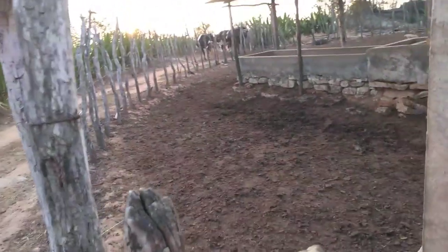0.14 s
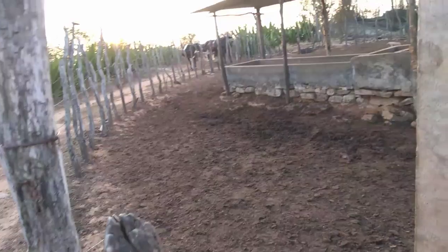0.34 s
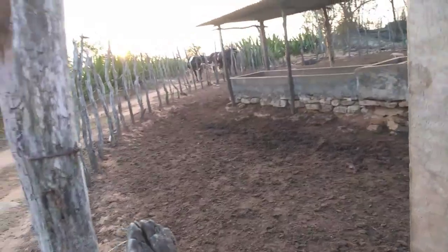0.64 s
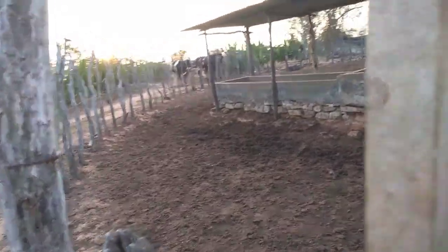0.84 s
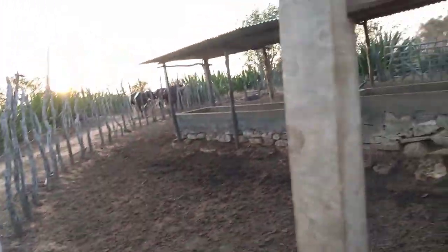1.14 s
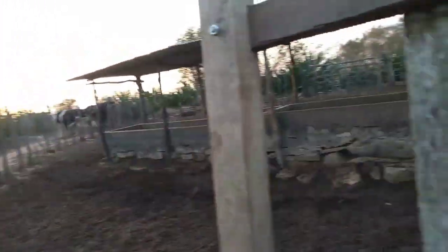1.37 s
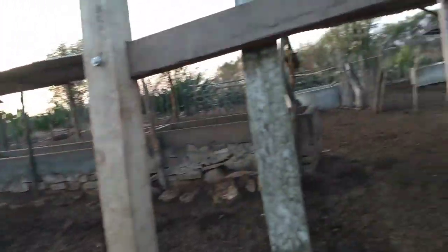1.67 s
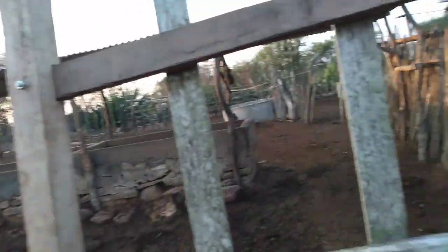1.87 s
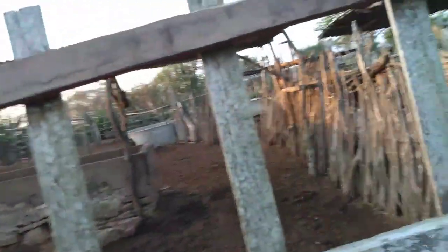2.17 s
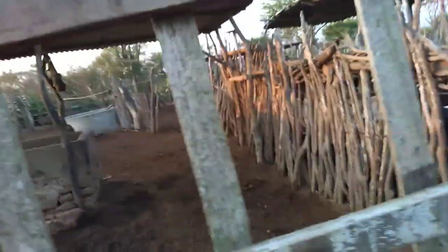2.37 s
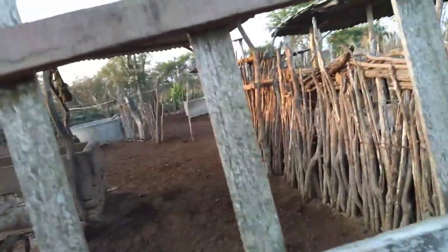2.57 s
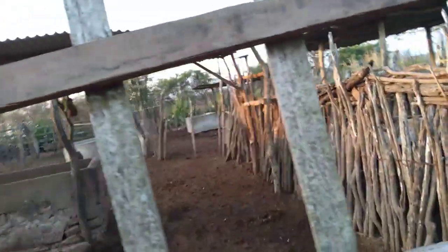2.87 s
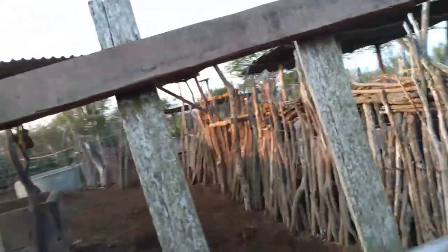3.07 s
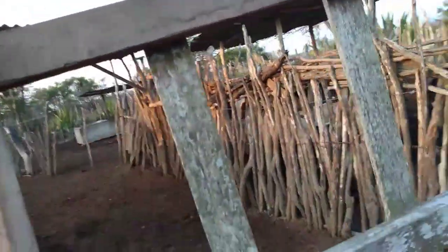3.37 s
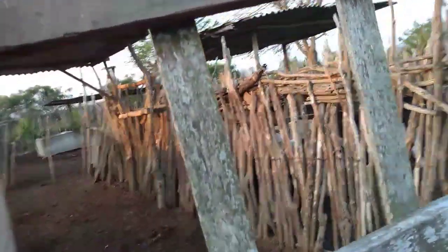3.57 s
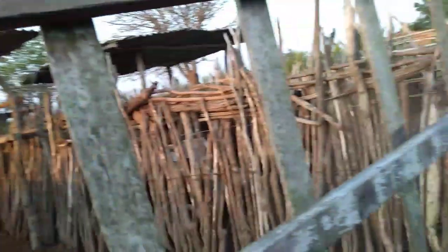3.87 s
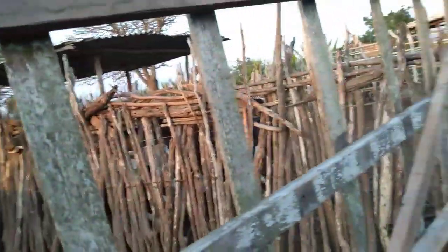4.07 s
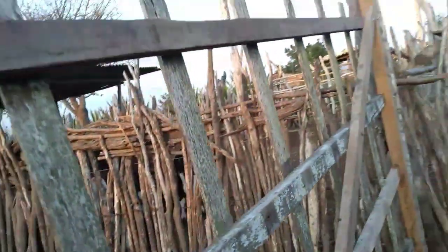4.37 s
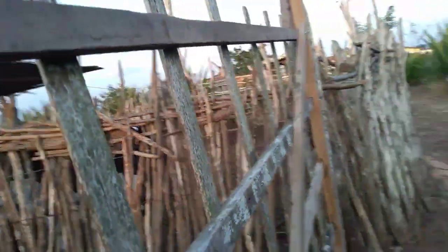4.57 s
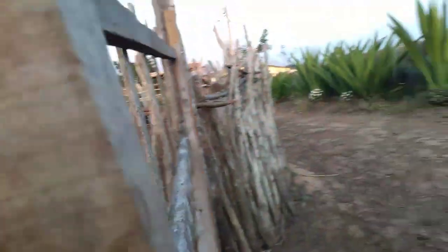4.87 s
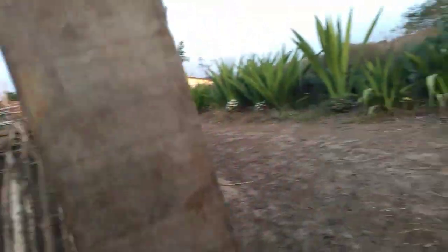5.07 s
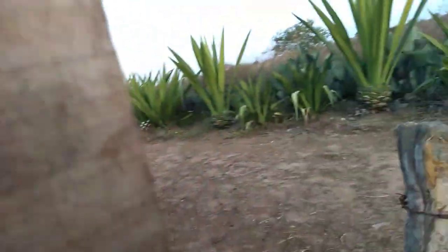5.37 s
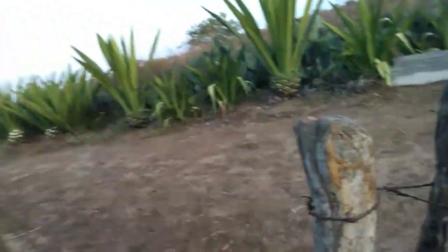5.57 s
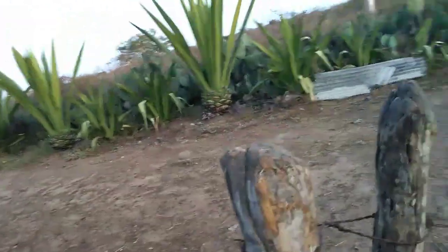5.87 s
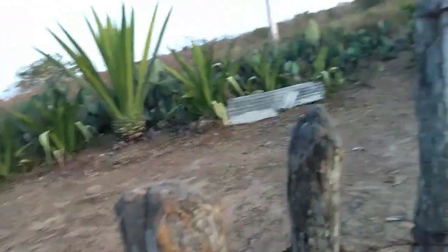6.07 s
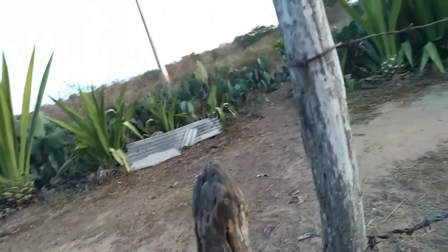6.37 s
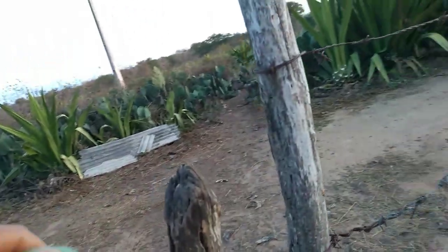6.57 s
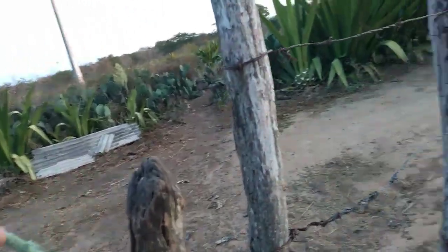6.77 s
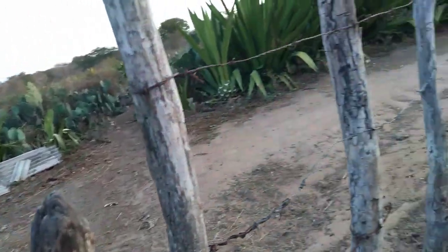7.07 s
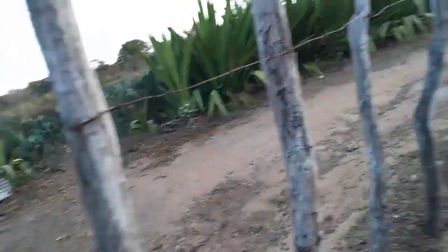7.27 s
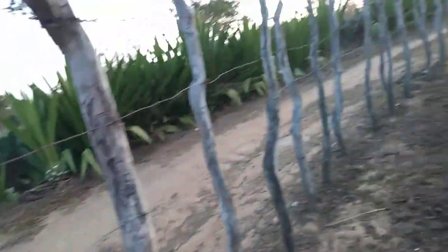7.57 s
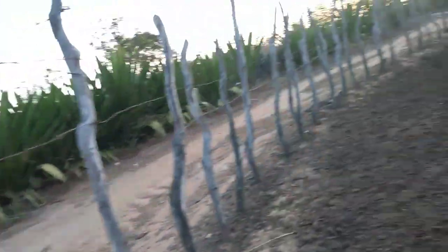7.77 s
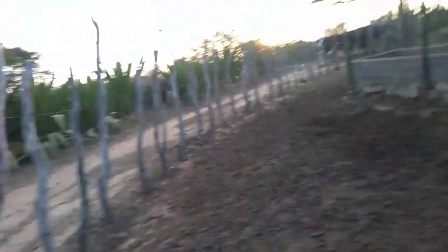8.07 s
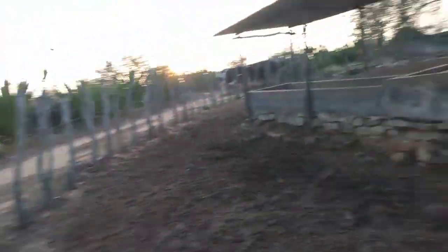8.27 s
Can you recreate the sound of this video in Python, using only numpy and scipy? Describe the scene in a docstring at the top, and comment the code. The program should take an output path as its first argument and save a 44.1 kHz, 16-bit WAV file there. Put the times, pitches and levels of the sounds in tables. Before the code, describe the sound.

In an outdoor farm pen, a cow gives a long, rising moo and another answers from farther off. A wooden latch knocks and wind buffets the microphone. A nearby gate then creaks open for about two seconds, its separate clicks speeding into a judder. After some faint scuffs on dry earth comes a second long moo, ending with a sharp wooden knock and more gusts.

```python
"""Cattle and a creaking farm gate

Two long moos and a distant third, each a buzz of vocal folds shaped by the throat. A wooden gate is
unlatched, swings on a hinge that sticks and slips, and knocks against its post. Gusts buffet the
microphones and feet scuff dry earth, over faint birds, leaves, a brushing sleeve and a far engine.
A stereo widener spreads the whole picture."""
import sys
import numpy as np
from scipy import signal
from scipy.fft import rfft, irfft
from scipy.io import wavfile
from scipy.ndimage import map_coordinates

SR = 44100
rng = np.random.default_rng(int(sys.argv[2]) if len(sys.argv) > 2 else 0)


def unload_audio(sound):
    """Save the sound as a 16-bit wav file, at the path given as the first command line argument."""
    columns = np.transpose(np.atleast_2d(sound))
    # keep every value between -1 and 1, then stretch to whole-number steps
    steps = np.round(np.clip(columns, -1, 1) * 32767)
    wavfile.write(sys.argv[1], SR, steps.astype(np.int16))


N = 372204
TIME = np.arange(N) / SR

# spectrum of the gate's loose boards: (frequency [Hz], level [dB])
BOARD_RATTLE = [(150, 15), (500, 6.5), (1100, -4.5), (1900, -5.5), (3000, -20), (5000, -26.5),
                (14000, -37.5)]


def first_cow():
    """A closed, rising moo: the mouth moves the upper resonances, which fade first as effort falls."""
    # (time [s], pitch [Hz], relative level [dB], mouth opening [factor on upper resonances])
    phrase = [(.47, 99, -48, 0.68), (.59, 136.4, -37.5, 1.21), (.67, 158.3, -36.5, 1.045),
              (.82, 165.2, -36, 1.16), (1.03, 165.4, -35.5, 1.127), (1.17, 167.3, -35.5, 1.165),
              (1.33, 172.1, -36.5, 1.28), (1.48, 176.1, -41.5, 1.2), (1.55, 168, -45, 1.4)]
    # low and upper resonances: (frequency [Hz], width [Hz], gain [dB])
    chest = [(162, 207, 4), (260, 42.3, 18.5)]
    upper = [(933, 134, -8), (1320, 147, -20), (1650, 470, -28), (2360, 350, -40.5), (3580, 900, -47)]
    t, pitch, level_db, mouth = curves(phrase)
    effort = amp(level_db - level_db.max())

    def gain_at(hz):
        return throat(chest, hz) + effort * throat(upper, hz, mouth)

    voice = moo(t, pitch, level_db + 3.5, gain_at, jitter=.0019, rough=.079)
    return place(voice, pan_db=5, wet_db=-14, t60=.35)


def second_cow(opens_at_s=6.22, opening_s=.057):
    """A shut-mouthed hum opens into a bawl that dulls as it tires."""
    # (time [s], pitch [Hz], relative level [dB])
    phrase = [(5.56, 106.1, -81), (5.66, 113.2, -58), (5.78, 127.2, -51.5), (5.92, 134.8, -49.5),
              (6.05, 140, -50), (6.22, 142, -47.5), (6.3, 142.5, -46.5), (6.6, 140.9, -47),
              (6.69, 138.4, -48), (6.76, 125.7, -48.5), (6.81, 107.2, -56.5)]
    # resonances with the mouth shut and open: (frequency [Hz], width [Hz], gain [dB])
    hum = [(137, 78, 19), (286, 180, 12), (705, 140, -2), (1035, 160, -4), (1274, 98, -7), (1408, 59, 2.5),
           (1750, 260, -33), (2950, 720, -12.5), (4770, 1400, -21)]
    bawl = [(140, 98, -8), (475, 78, 10.5), (720, 75, -10.5), (1012, 73, -14), (1380, 202, -4),
            (1591, 120, -24), (1813, 72, -2.5), (2426, 300, -20.5), (3210, 830, -29), (4950, 180, -26)]
    t, pitch, level_db = curves(phrase)
    mouth = np.clip((t - opens_at_s) / opening_s, 0, 1)
    tilt_db_per_khz = 2.5 * (level_db - level_db.max())

    def gain_at(hz):
        dulling = amp(tilt_db_per_khz * hz / 1000)
        return (1 - mouth) * throat(hum, hz) + mouth * throat(bawl, hz) * dulling

    voice = moo(t, pitch, level_db + 1.5, gain_at, jitter=.002, rough=.11)
    return place(voice, pan_db=5, wet_db=-12, t60=.35)


def far_cow():
    """An answer from farther off: distance leaves little but one throat resonance."""
    # (time [s], pitch [Hz], relative level [dB])
    phrase = [(1.38, 194.4, -64), (1.47, 192.4, -41), (1.58, 186.5, -37), (1.68, 192.3, -46.5),
              (1.8, 204.1, -37.5), (1.92, 215, -44), (2.0, 211, -42), (2.08, 200, -62)]
    # (frequency [Hz], width [Hz], gain [dB])
    resonances = [(200.3, 270, 6.5), (961, 115, -8), (1501, 840, -30.5)]
    t, pitch, level_db = curves(phrase)
    voice = moo(t, pitch, level_db - 15, lambda hz: throat(resonances, hz), jitter=.0045, rough=.36)
    return place(voice, pan_db=12, wet_db=1.5, t60=.62)


def moo(t, pitch, level_db, gain_at, jitter, rough):
    """Harmonics of the vocal folds through the throat; the higher ones flutter more."""
    turns = np.cumsum(pitch * (1 + jitter * drift(len(t), 45.3))) / SR
    voice, power = 0, 0
    for k in range(1, 42):
        gain = gain_at(k * pitch)
        flutter = np.interp(t, np.arange(1200) / 130, rng.standard_normal(1200))
        harmonic = np.cos(2 * np.pi * k * turns - np.sqrt(k) * np.pi)
        voice += gain * (1 + rough * np.sqrt(k) * flutter) * harmonic
        power += gain ** 2 / 2
    out = np.zeros(N)
    add(out, t[0], voice / np.sqrt(power) * amp(level_db) * signal.windows.tukey(len(t), .04))
    return out


def throat(resonances, hz, factor=1):
    """Gain of steep-sided resonances at the frequency hz."""
    return sum(amp(db) / (1 + ((hz - centre * factor) / (width / 2)) ** 2 / 2) ** 1.5
               for centre, width, db in resonances)


def hinge(squeak_peak_s=.0021, timbre_turn_s=.3, hard_slip_db=-26):
    """Each slip cracks, squeaks and rings the gate; the timbre shifts as the gate swings."""
    # the gate's ring: (frequency [Hz], level [dB], t60 [s])
    gate_modes = [(269.4, -17, 0.2), (414, -20.5, 0.049), (579.5, -13.5, 0.11), (784.3, -12.5, 0.087),
                  (834, -37, 0.075), (978.6, -7.5, 0.07), (1118.5, -13.5, 0.093), (1307, -8, 0.05),
                  (1430, -17, 0.061), (1540, -11, 0.023), (1730, 5.5, 0.015), (1920, 8, 0.02),
                  (2408, -8.5, 0.048), (2780, -19, 0.01), (3493, -11, 0.035), (4690, -3, 0.018),
                  (5480, -22, 0.0091), (6190, -11, 0.021)]
    # spectra of a slip: (frequency [Hz], level [dB])
    crack_colour = [(800, -16), (2500, -7), (4200, -3), (5300, 3), (6400, 4), (7600, -12), (11000, -16),
                    (14000, -26)]
    rasp_colour = [(200, 2.5), (400, -7), (800, 6.5), (1800, 4.5), (2500, 9.5), (3150, -8.5), (3700, -2.5),
                   (5200, -9), (6100, -21), (7300, -37), (14000, -33)]
    t, out = np.arange(9000) / SR, np.zeros(N)
    grains = rng.standard_normal((12, 3, len(t)))
    shades = rng.standard_normal((12, len(gate_modes), 2))
    attack = 1 - np.exp(-(t / .0032) ** 2)
    squeak_shape = (t / squeak_peak_s * np.exp(1 - t / squeak_peak_s)) ** 2  # the pin sings briefly
    crack_shape = np.exp(-((t - .003) / .0014) ** 2)
    waver = 1 + .029 * drift(len(t), 704)
    for s, level_db, bright_db, squeak_hz in stick_slip():
        swing = s / timbre_turn_s  # neighbouring slips sound alike, so fast runs take on a pitch
        grain = morph(grains, swing) + .55 * rng.standard_normal((3, len(t)))
        modes = [(hz * (1 + .012 * detune), db + shade_db, t60)
                 for (hz, db, t60), (detune, shade_db) in zip(gate_modes, morph(shades, swing))]
        squeak = amp(-5) * squeak_shape * np.sin(2 * np.pi * np.cumsum(squeak_hz * waver) / SR)
        crack_db = -10 + .76 * (level_db - hard_slip_db) + bright_db  # harder slips crack more
        crack = amp(crack_db) * coloured(grain[0], crack_colour) * crack_shape
        rasp = 2 * amp(-6) * coloured(grain[1], rasp_colour, bright_db) * np.exp(-t / .0049)
        boards = amp(-14) * coloured(grain[2], BOARD_RATTLE) * np.exp(-t / .024)
        body = amp(-1) / 2 * ring(modes, t, tilt_db=bright_db) + rasp + boards
        add(out, s, amp(level_db) * (squeak + crack + body * attack))
    return place(out, pan_db=14, wet_db=-3.5, t60=.13)


def stick_slip(judder_bright_db=.25):
    """The hinge slips singly while the gate moves slowly, and judders as it speeds up."""
    # (time [s], level [dB], brightness [dB/octave], squeak [Hz])
    single_slips = [(2.183, -27, -1.5, 1635), (2.264, -28.5, -2.5, 1620), (2.351, -31, -4, 1570),
                    (2.428, -27, -3, 1670), (2.485, -33.5, -3, 1780), (2.523, -30, -4, 1650),
                    (2.562, -26.5, -3, 1730), (2.601, -27, 1, 1925), (2.639, -26.5, 1, 1750),
                    (2.672, -29, 1.5, 1860), (2.695, -31, 0.5, 1950), (2.712, -33, 2.5, 1870),
                    (2.728, -34.5, -2, 1880), (2.749, -32.5, 4.5, 1850), (3.188, -34.5, 2.5, 1880),
                    (3.21, -38.5, 0, 1816), (3.23, -35.5, 3, 1743), (3.252, -39, 1, 1695),
                    (3.283, -35, 1.5, 1724), (3.306, -40.5, 2, 1730), (3.339, -37.5, 3, 1730),
                    (3.38, -37, 2, 2350), (3.431, -35.5, 2.5, 2410), (3.477, -37.5, 4, 2510),
                    (3.52, -36, 2.5, 2480), (3.565, -33.5, 5, 2410), (3.574, -47, -3, 2370),
                    (3.599, -37, 5.5, 2423), (3.695, -38.5, 6, 1845), (3.735, -37, 7, 1910),
                    (3.749, -39, 8, 2450)]
    # two nearly regular runs, each: (time [s], rate [slips/s], level [dB])
    judders = [
        [(2.768, 55, -35.5), (2.82, 56, -39), (2.9, 57, -37.5), (2.925, 110, -42.5), (2.95, 85, -40.5),
         (2.975, 58.5, -40), (3.03, 57, -38.5), (3.055, 82, -43), (3.1, 74, -39.5), (3.178, 59, -37)],
        [(3.618, 57, -40), (3.655, 88, -40), (3.69, 62, -44.5), (3.75, 65, -44.5), (3.78, 88, -41),
         (3.82, 59, -40), (3.85, 82, -48), (3.89, 55, -56)],
    ]
    slips = list(single_slips)
    for run in judders:
        s, rate, level_db = np.transpose(run)
        now = s[0]
        while now < s[-1]:
            late, higher = rng.standard_normal(2)
            squeak_hz = 1844 * 2 ** (.22 * higher)
            slips.append((now, np.interp(now, s, level_db), judder_bright_db, squeak_hz))
            now += (1 + .08 * late) / np.interp(now, s, rate)
    return slips


def knocks():
    """The latch and then the gate hit wood: a few strong cycles and a short rattle of loose boards."""
    # (time [s], level [dB], tuning [factor on the modes])
    blows = [(0.8968, -13, 0.51), (0.908, -21, 0.49), (.9195, -38, 0.53), (3.744, -31, 0.92),
             (5.369, -46, 1.75), (6.8187, -9, 1.02), (6.8217, -13, 0.892), (6.833, -27, 0.84),
             (6.852, -30, 0.62), (6.883, -33.5, 0.95), (8.043, -40.5, 1.41)]
    # (base frequency [Hz], level [dB], t60 [s])
    wood_modes = [(304, -19.5, 0.11), (559, -19, 0.12), (1013, -1.5, 0.014), (1113, -4.5, 0.018),
                  (1720, -14, 0.017), (2250, -12.5, 0.0078), (3570, -20.5, 0.0088), (4730, -35, 0.042)]
    t, out = np.arange(9000) / SR, np.zeros(N)
    attack = 1 - np.exp(-t / .00065)
    for s, level_db, tuning in blows:
        rattle = amp(-15) * noise(BOARD_RATTLE, len(t)) * np.exp(-t / .023)
        add(out, s, amp(level_db) * (ring(wood_modes, t, tuning) + rattle) * attack)
    return place(out, pan_db=12.5, wet_db=-26, t60=.19)


def wind():
    """Gusts drive lumpy turbulence, unrelated at each microphone, and carry eddies with them."""
    # (peak time [s], half-width [s], relative level [dB])
    gusts = [(.6, 0.15, -34), (1.05, 0.089, -20.5), (1.35, 0.13, -25), (1.75, 0.18, -19),
             (2.0, 0.17, -20.5), (2.56, 0.054, -32), (3.3, 0.34, -49), (5.7, 0.18, -41),
             (6.54, 0.034, -20.5), (6.88, 0.08, -22), (7.45, 0.12, -29), (8.08, 0.085, -23.5)]
    # (frequency [Hz], level [dB])
    rumble_colour = [(18, -59.5), (35, -13), (60, 1.5), (110, 0.5), (170, -6.5), (230, -16), (330, -25.5),
                     (460, -43), (700, -57), (1500, -99)]
    # the strongest eddies: (time [s], relative level [dB], frequency [Hz])
    buffets = [(1.035, -17.5, 142), (1.629, -23.5, 130), (1.709, -14.5, 123), (1.745, -18.5, 125),
               (1.847, -19, 138), (1.873, -20, 163), (1.908, -20, 150), (1.996, -14.5, 165),
               (2.025, -21, 110), (2.079, -18.5, 159), (2.094, -17, 135), (2.218, -28.5, 181),
               (2.306, -25.5, 110), (3.383, -32.5, 75.5), (6.555, -20.5, 136.5), (6.855, -14.5, 173),
               (7.278, -19, 93), (7.481, -21, 150), (7.693, -24, 100), (7.886, -23, 92)]
    strength = swells(gusts, rest_db=-48.5)
    turbulence = np.array([noise(rumble_colour, N) * evened(amp(5 * drift(N, 35))) for _ in range(2)])
    out = amp(-4.5) * strength * turbulence
    lesser = [(s, 20 * np.log10(strength[int(s * SR)]) - 5 + 3 * min(deviate, .5), 106)
              for s, deviate in chance(per_s=9, size=160)]
    t = np.arange(-2000, 2000) / SR
    for s, level_db, hz in buffets + lesser:
        add(out, s + t[0], amp(level_db + 9) * eddy(t, hz))
    return out


def eddy(t, hz, cycles=.55):
    """One eddy thumps the left or right microphone and breaks up into finer ones."""
    # (frequency [Hz], level [dB])
    flutter_colour = [(80, 4), (220, 5.5), (380, -3.5), (600, -15), (900, -32), (2000, -56)]
    phase, side = rng.random(), np.round(rng.random())
    from_core = t * hz / cycles
    swirl = .55 * cycles * (from_core + np.arcsinh(2 * from_core) / 2)  # fastest at the core
    thump = np.cos(2 * np.pi * (swirl + phase)) / np.cosh(np.clip(2.22 * from_core, -50, 50))
    flutter = amp(-19) * noise(flutter_colour, len(t)) * np.exp(-(t / .0057) ** 2)
    return (thump + flutter) * np.array([[side], [1 - side]])


def scuffs():
    """Short grainy scrapes of hands, and of feet on dry earth."""
    # (time [s], level [dB], decay [s], brightness [dB/octave])
    scrapes = [(0.132, -53, 0.048, -1), (0.324, -52.5, 0.021, 3), (0.607, -37, 0.01, 2),
               (0.812, -40.5, 0.013, 0.5), (1.313, -39.5, 0.0069, -4.5), (4.273, -62, 0.05, 2),
               (4.304, -54.5, 0.0091, -10), (4.389, -55.5, 0.015, -7), (4.648, -56.5, 0.017, 5.5),
               (5.222, -57, 0.036, -3), (5.263, -47.5, 0.0084, -9), (5.299, -64.5, 0.12, 0.5),
               (5.365, -52.5, 0.021, 0), (5.447, -55, .008, 2.5), (5.725, -49.5, 0.0092, -7),
               (5.965, -59, 0.033, 3), (6.037, -45.5, 0.024, 3), (6.065, -39.5, 0.0056, 1),
               (7.335, -50.5, 0.027, 2.5), (7.917, -22.5, 0.0014, 10), (8.035, -49.5, 0.017, -1),
               (7.042, -50.5, 0.006, 5)]
    # (frequency [Hz], level [dB])
    grit_colour = [(200, -43), (900, 8.5), (1600, 12), (3200, -2.5), (6000, -10), (14000, -18)]
    t, out = np.arange(12000) / SR, np.zeros(N)
    attack = 1 - np.exp(-t / .0046)
    for s, level_db, decay_s, bright_db in scrapes:
        grains = evened(amp(2.55 * drift(len(t), 500)))
        grit = noise(grit_colour, len(t), bright_db) * grains
        add(out, s, amp(level_db) * grit * attack * np.exp(-t / decay_s))
    return place(out, pan_db=9, wet_db=-8, t60=.35)


def sleeve():
    """Cloth brushes close by in soft swells of hiss."""
    # (peak time [s], half-width [s], relative level [dB])
    brushes = [(.23, 0.55, -60.5), (.65, 0.082, -58.5), (.88, 0.074, -52.5), (1.4, 0.18, -54.5),
               (3.15, 0.11, -55.5), (3.55, 0.38, -59), (4.69, 0.13, -60), (5.9, 0.2, -55.5),
               (6.37, 0.088, -53.5), (6.67, 0.12, -57.5), (7.4, 0.1, -57), (8.02, 0.63, -59)]
    # (frequency [Hz], level [dB])
    cloth_colour = [(500, 13), (1500, 5.5), (3500, -1.5), (7000, -4.5), (14000, -5.5)]
    return stereo_noise(cloth_colour) * swells(brushes) * amp(-1 + .28 * drift(N, 30))


def birds():
    """Thin gliding whistles from the hedge."""
    # (time [s], length [s], start pitch [Hz], end pitch [Hz], level [dB])
    whistles = [(0.118, 0.066, 3000, 4500, -62), (0.149, 0.037, 3000, 3930, -61),
                (1.065, .04, 3500, 3750, -67), (7.43, 0.1, 4850, 4400, -76), (7.59, 0.22, 6900, 6150, -76),
                (7.6, 0.24, 5250, 4500, -77), (7.9, 0.15, 5700, 5150, -76)]
    out = np.zeros(N)
    for s, length, start_hz, end_hz, level_db in whistles:
        size = int(length * SR)
        hz = np.linspace(start_hz, end_hz, size) * (1 + .0079 * drift(size, 125))
        add(out, s, amp(level_db) * np.hanning(size) * np.sin(2 * np.pi * np.cumsum(hz) / SR))
    return place(out, pan_db=11, wet_db=0, t60=.6)


def far_engine(drone_hz=146.1):
    """A distant engine drones on one wavering tone."""
    # (time [s], level [dB])
    fader = [(0, -43.5), (3.25, -46), (3.65, -53), (4.2, -53), (5.5, -48), (6.4, -53), (8.44, -50.5)]
    hz = drone_hz * (1 + .025 * drift(N, 20))
    level_db = np.interp(TIME, *np.transpose(fader)) + 2.2 * drift(N, 14)
    return amp(level_db) * np.sin(2 * np.pi * np.cumsum(hz) / SR)


def open_air():
    """The low murmur of the land, mostly common to both microphones."""
    # (frequency [Hz], level [dB])
    air_colour = [(30, 1), (70, 10), (140, 9.5), (260, 7.5), (500, -2.5), (1000, -15), (1800, -33),
                  (2800, -38), (6000, -69), (14000, -51)]
    murmur = noise(air_colour, N) + amp(-7) * stereo_noise(air_colour)
    return murmur * amp(-60 + .5 * drift(N, 4.6))


def leaves():
    """Stirring leaves make a faint, flickering hiss."""
    # (frequency [Hz], level [dB])
    leaf_colour = [(500, -2.5), (1500, 6), (3500, -1.5), (7000, -6), (14000, -9.5)]
    return stereo_noise(leaf_colour) * amp(-69.5 + 2 * drift(N, 20))


def ring(modes, t, factor=1, tilt_db=0):
    """Dying modes of a struck body, of alternating sign, tilted per octave about the middle one."""
    middle_hz = modes[len(modes) // 2][0]
    out = 0
    for k, (hz, db, t60) in enumerate(modes):
        envelope = amp(db + tilt_db * np.log2(hz / middle_hz) - 60 * t / t60)
        out += (-1) ** k * envelope * np.sin(2 * np.pi * hz * factor * t)
    return out


def place(x, pan_db, wet_db, t60):
    """The direct sound at two microphones (positive pan is left), plus scatter from fences and walls."""
    t = np.arange(SR // 2) / SR
    taps = rng.standard_normal((2, len(t))) * (rng.random((2, len(t))) < .06)
    taps *= (t > .003) * amp(-60 * t / t60)
    taps = signal.lfilter([1], [1, -.5], taps)  # darkens the echoes
    taps /= np.linalg.norm(taps, axis=1, keepdims=True)
    scatter = signal.oaconvolve(x[None], taps, axes=1)[:, :N]
    return x * amp([[pan_db / 2], [-pan_db / 2]]) + amp(wet_db) * scatter


def amp(db):
    """Decibels to gain."""
    return 10 ** (np.asarray(db) / 20)


def evened(x):
    """Scales to rms 1."""
    return x / np.sqrt(np.mean(x ** 2) + 1e-20)


def add(mix, s, sound):
    """Mixes a sound in at time s."""
    part = mix[..., max(round(s * SR), 0):][..., :sound.shape[-1]]
    part += sound[..., :part.shape[-1]]


def curves(rows):
    """Joins rows by straight lines: the times, then each column."""
    s, *columns = np.transpose(rows)
    t = np.arange(s[0], s[-1], 1 / SR)
    return [t] + [np.interp(t, s, c) for c in columns]


def coloured(white, points, tilt_db=0):
    """Gives white noise a spectrum, tilted per octave, at rms 1."""
    f, db = np.transpose(points)
    hz = np.fft.rfftfreq(len(white), 1 / SR) + 1
    gain = amp(np.interp(np.log(hz), np.log(f), db) + tilt_db * np.log2(np.maximum(hz, f[0])))
    return evened(irfft(rfft(white) * gain, len(white)))


def noise(points, size, tilt_db=0):
    """Fresh noise of rms 1 with a given spectrum."""
    return coloured(rng.standard_normal(size), points, tilt_db)


def stereo_noise(points):
    """A bed of noise, unrelated left and right."""
    return np.array([noise(points, N), noise(points, N)])


def drift(size, rate):
    """Smooth random wander of rms 1."""
    knots = rng.standard_normal(600)
    return evened(map_coordinates(knots, [np.arange(size) * rate / SR], order=3, mode="wrap"))


def swells(rows, rest_db=-np.inf):
    """Strength over time: smooth swells that add in power over a resting level."""
    power = sum((amp(db) / np.cosh(np.clip((TIME - s) / width, -20, 20))) ** 2 for s, width, db in rows)
    return np.sqrt(power + amp(rest_db) ** 2)


def chance(per_s, size):
    """Loosely spaced random moments, each with a normal deviate."""
    s = (np.arange(size) + rng.random(size)) / per_s
    return [(when, z) for when, z in zip(s, rng.standard_normal(size)) if when < TIME[-1]]


def morph(states, position):
    """Fades at equal power from each random state to the next."""
    k, angle = int(position) % (len(states) - 1), position % 1 * np.pi / 2
    return np.cos(angle) * states[k] + np.sin(angle) * states[k + 1]


def scene():
    """The pen as the two microphones hear it."""
    cattle = first_cow() + second_cow() + far_cow()
    gate = hinge() + knocks()
    return cattle + gate + wind() + scuffs() + sleeve() + birds() + far_engine() + open_air() + leaves()


def record(dry, crossfeed=.66, low_cut_hz=30, high_cut_hz=14350):
    """Widens by subtracting from each channel a late, duller copy of the other, then trims the band."""
    late = signal.lfilter(np.r_[np.zeros(20), .17, .66, .17], [1], dry[::-1])
    wide = dry - crossfeed * late
    wide = signal.sosfilt(signal.butter(2, low_cut_hz, "highpass", fs=SR, output="sos"), wide)
    high_cut = signal.firwin(511, high_cut_hz, window=("kaiser", 9), fs=SR)
    return signal.oaconvolve(wide, high_cut[None], "same")


dry = scene()
out = record(dry)
unload_audio(out)
```